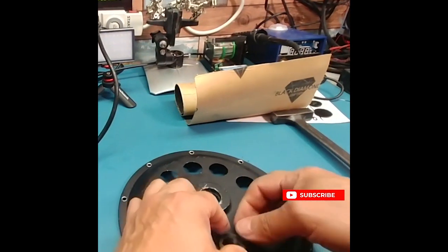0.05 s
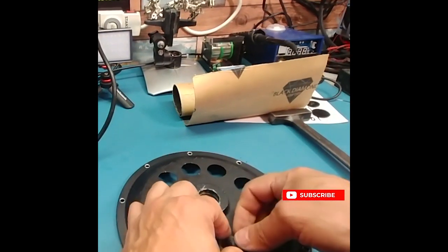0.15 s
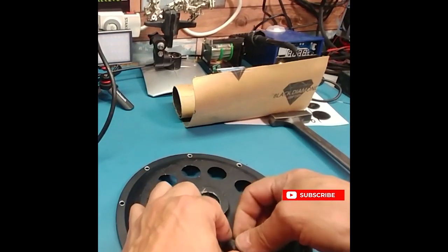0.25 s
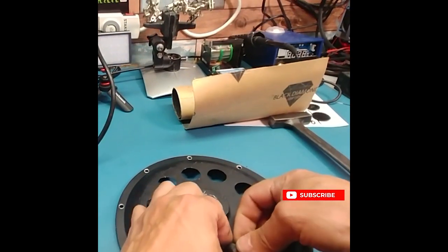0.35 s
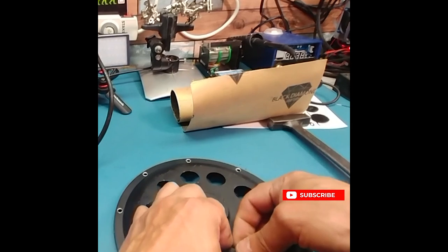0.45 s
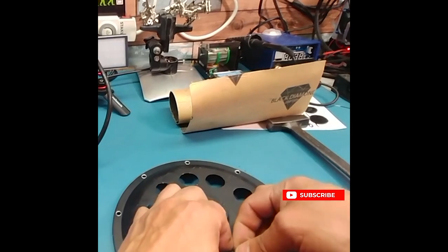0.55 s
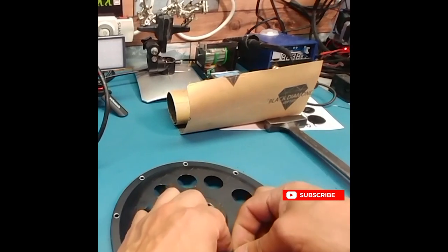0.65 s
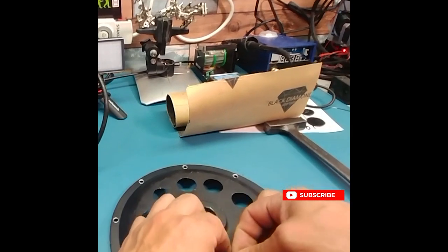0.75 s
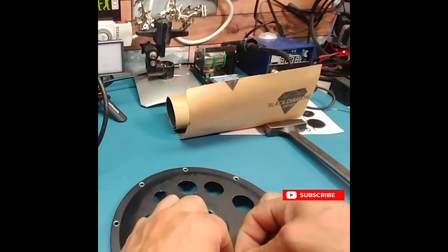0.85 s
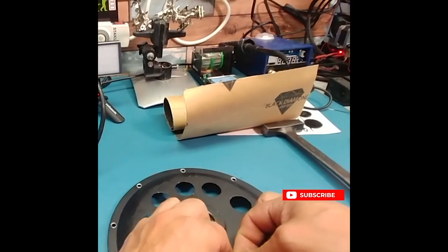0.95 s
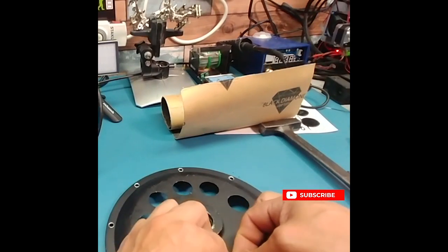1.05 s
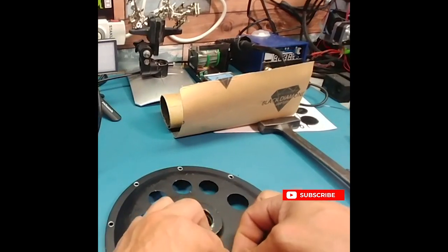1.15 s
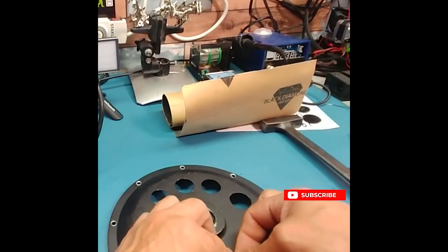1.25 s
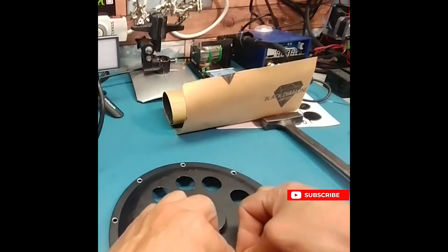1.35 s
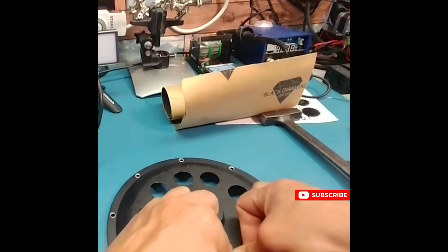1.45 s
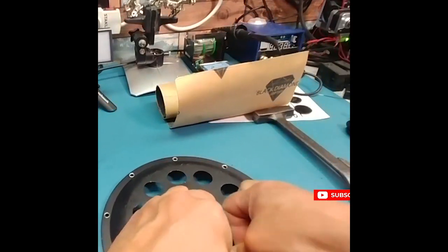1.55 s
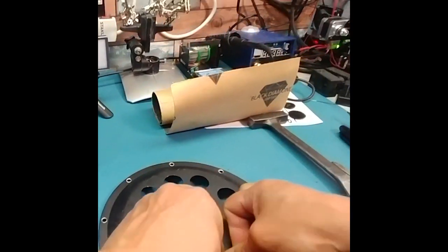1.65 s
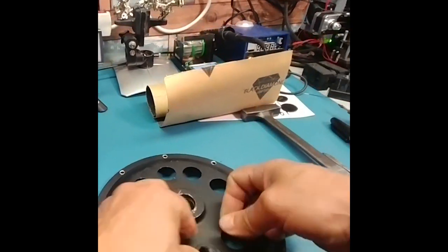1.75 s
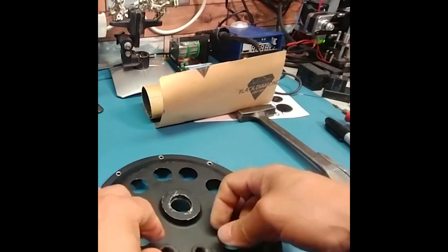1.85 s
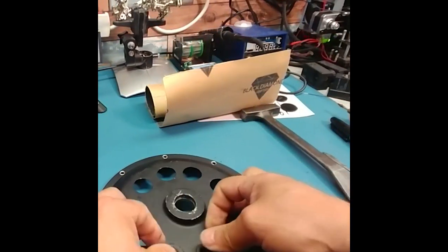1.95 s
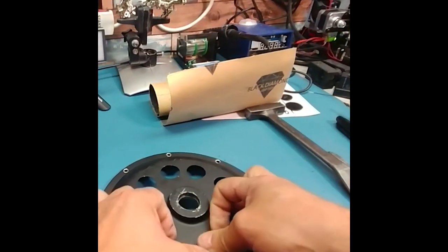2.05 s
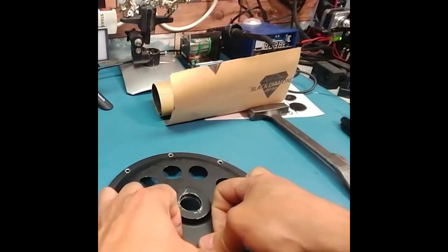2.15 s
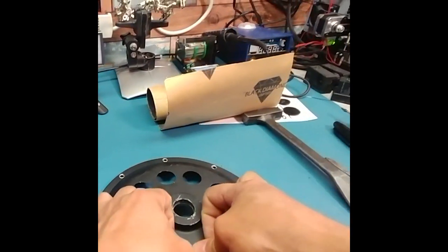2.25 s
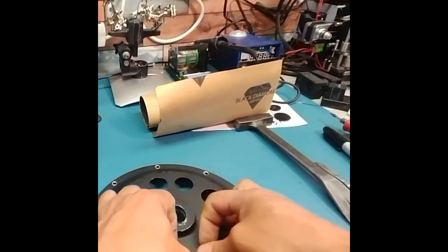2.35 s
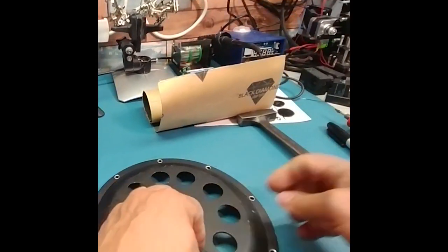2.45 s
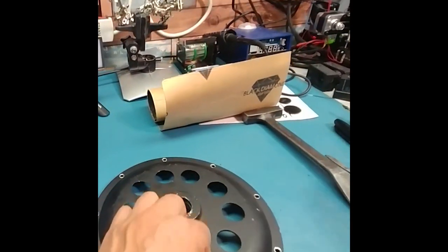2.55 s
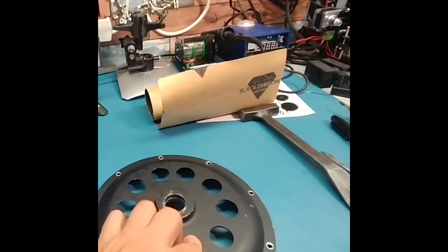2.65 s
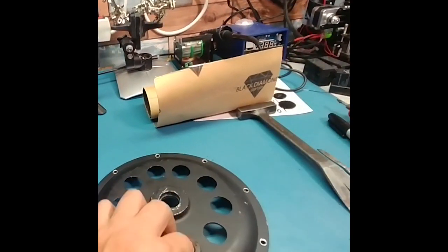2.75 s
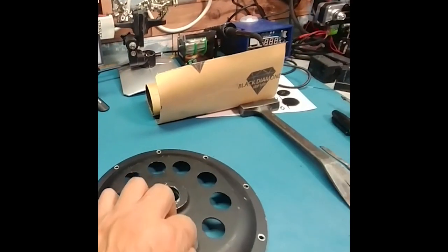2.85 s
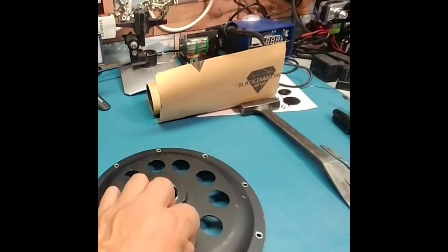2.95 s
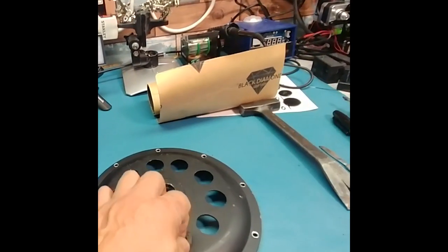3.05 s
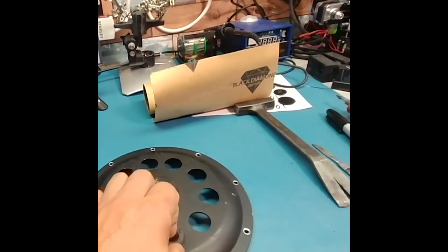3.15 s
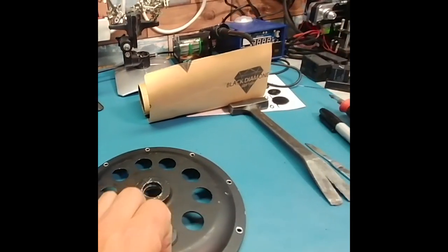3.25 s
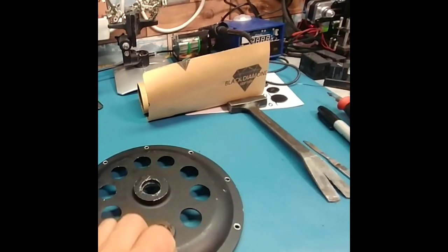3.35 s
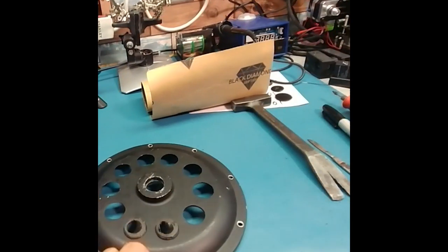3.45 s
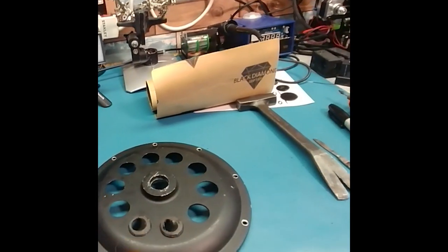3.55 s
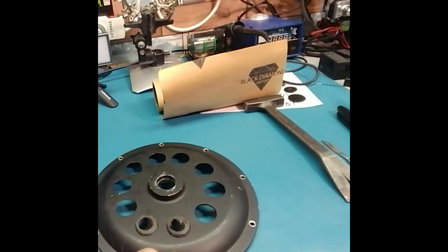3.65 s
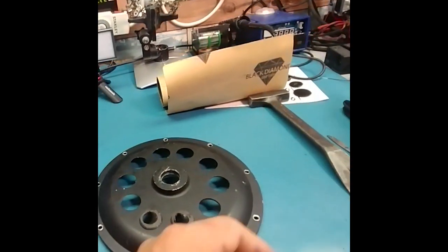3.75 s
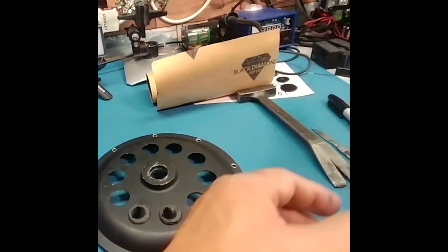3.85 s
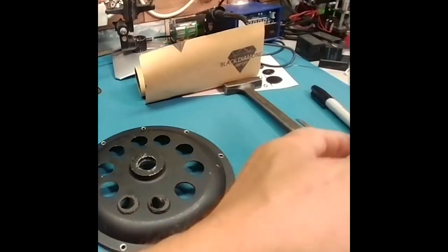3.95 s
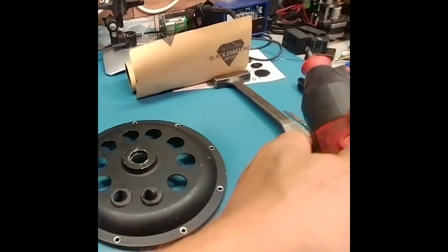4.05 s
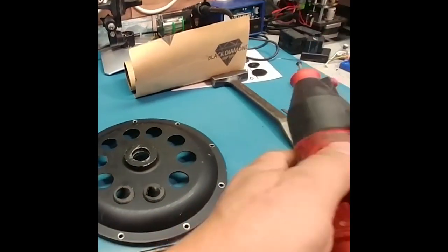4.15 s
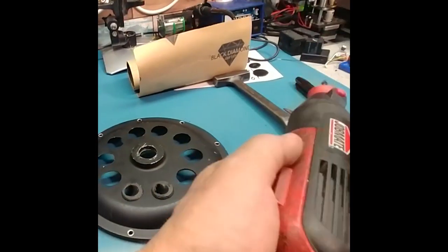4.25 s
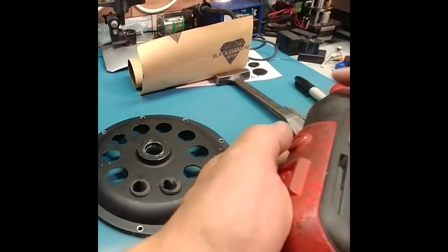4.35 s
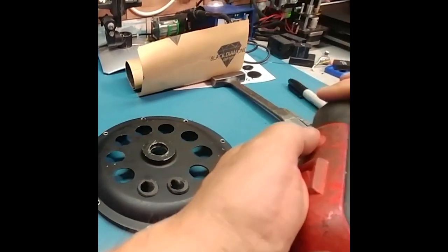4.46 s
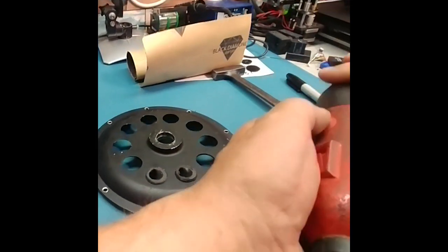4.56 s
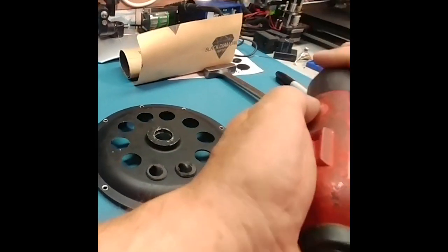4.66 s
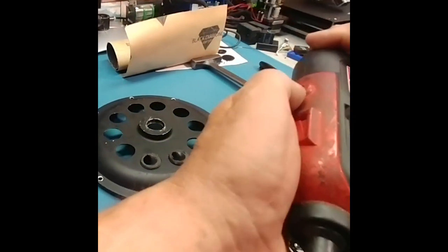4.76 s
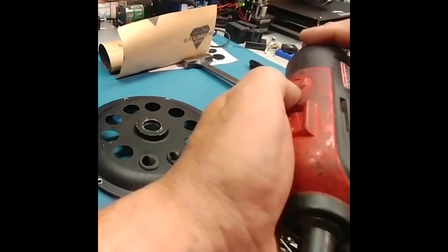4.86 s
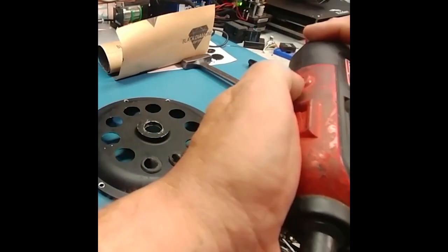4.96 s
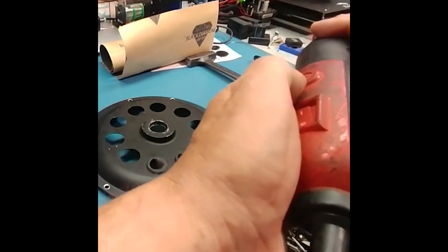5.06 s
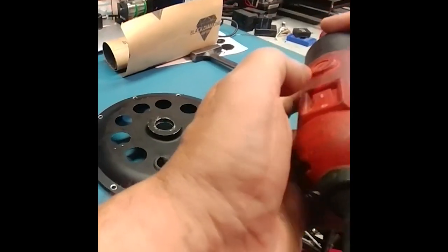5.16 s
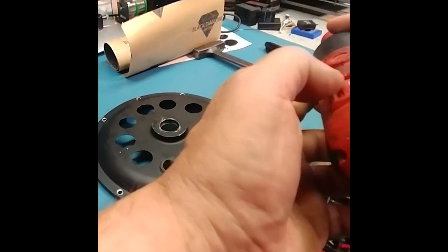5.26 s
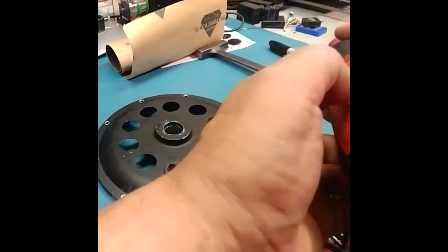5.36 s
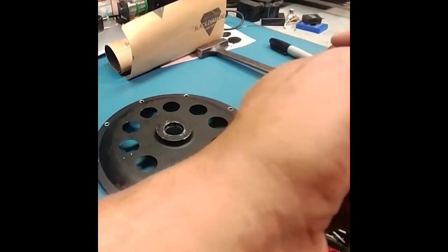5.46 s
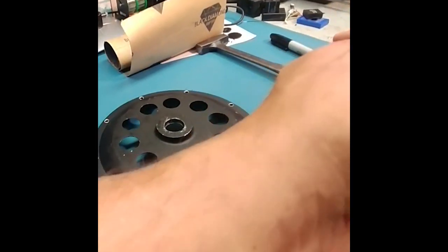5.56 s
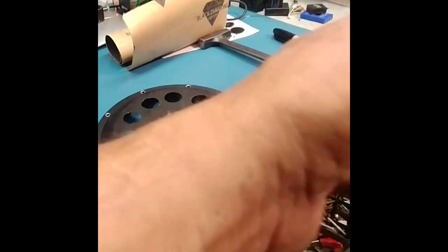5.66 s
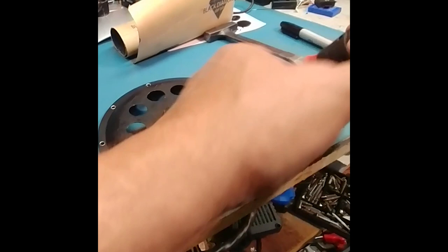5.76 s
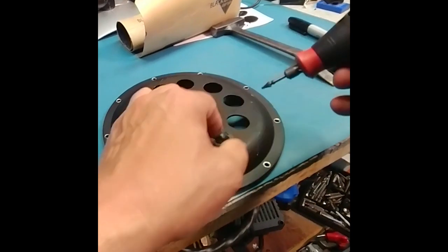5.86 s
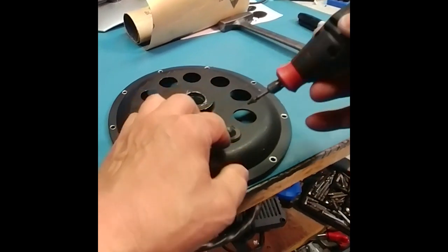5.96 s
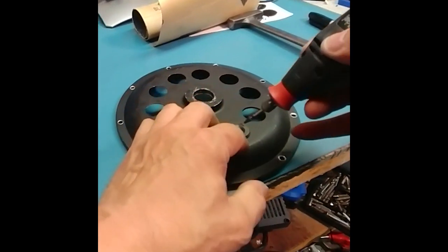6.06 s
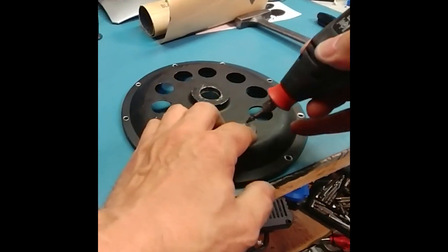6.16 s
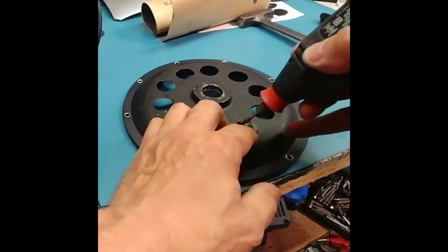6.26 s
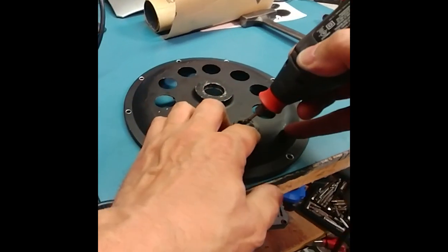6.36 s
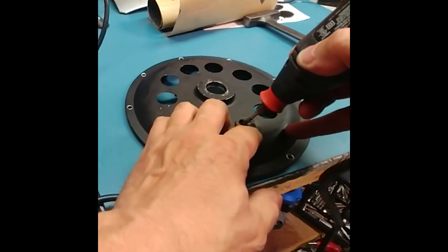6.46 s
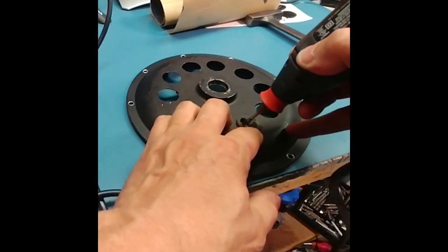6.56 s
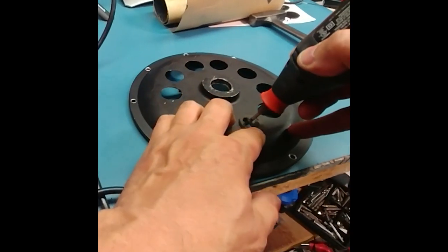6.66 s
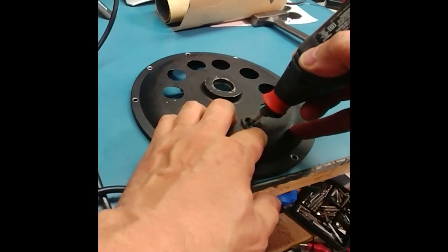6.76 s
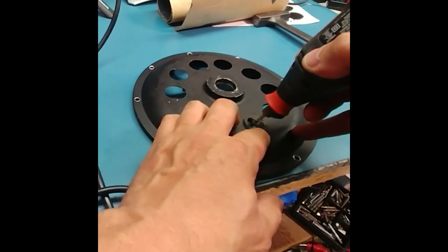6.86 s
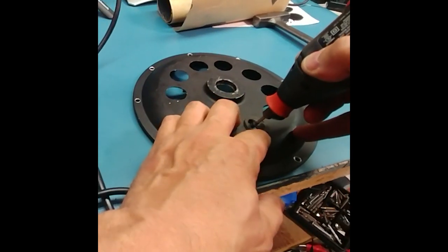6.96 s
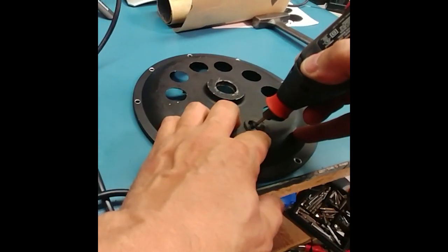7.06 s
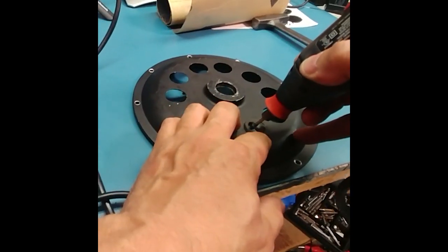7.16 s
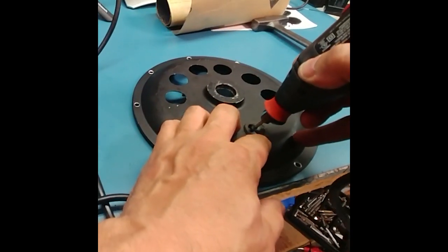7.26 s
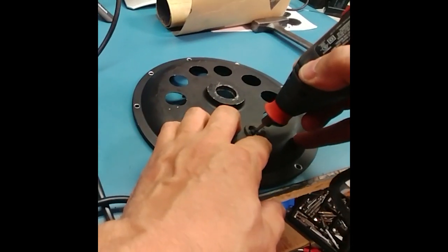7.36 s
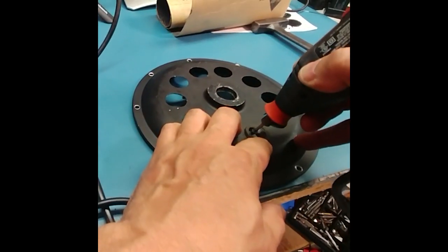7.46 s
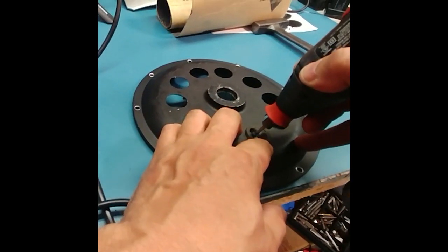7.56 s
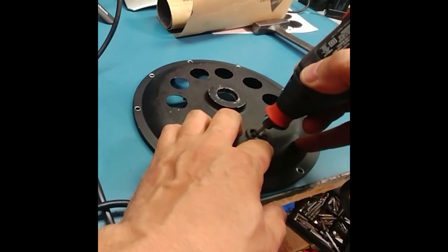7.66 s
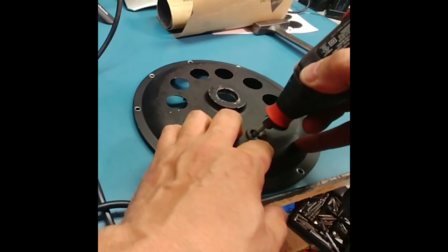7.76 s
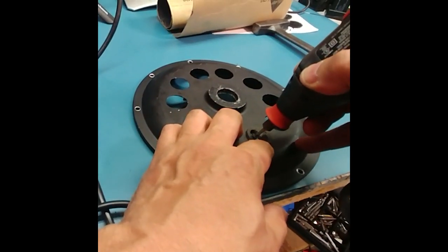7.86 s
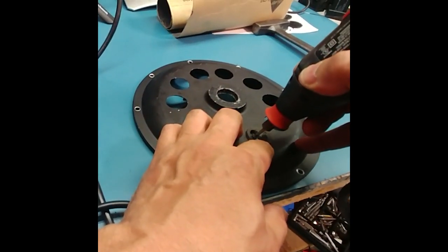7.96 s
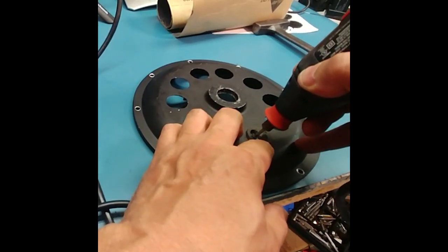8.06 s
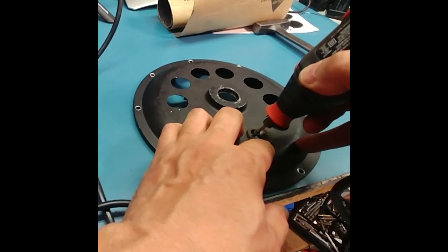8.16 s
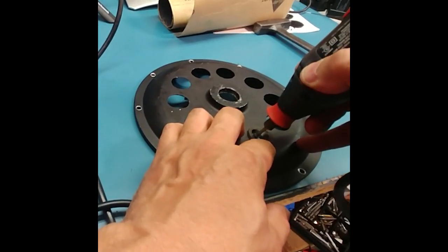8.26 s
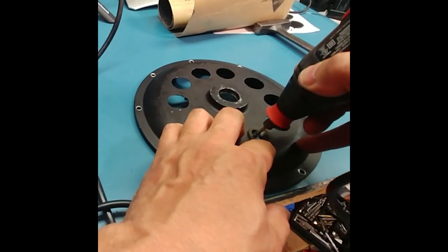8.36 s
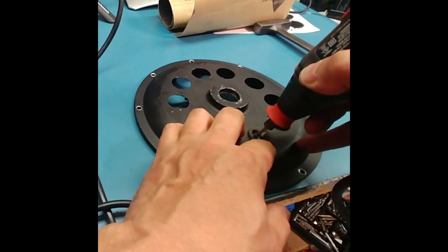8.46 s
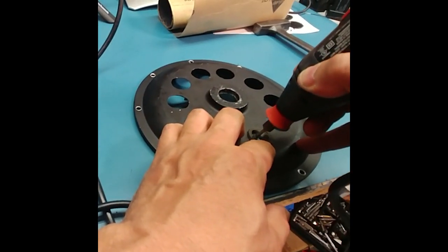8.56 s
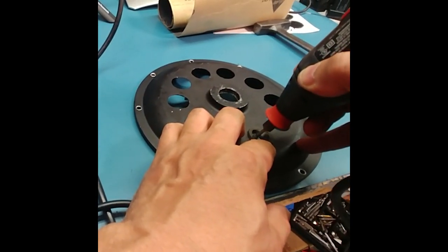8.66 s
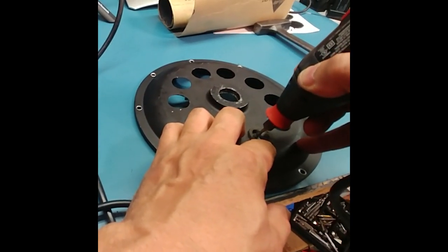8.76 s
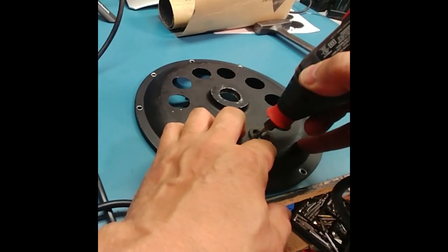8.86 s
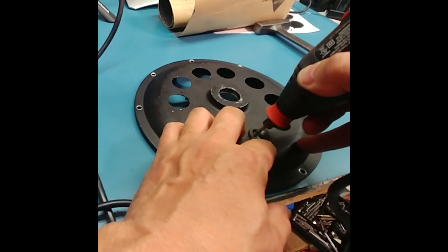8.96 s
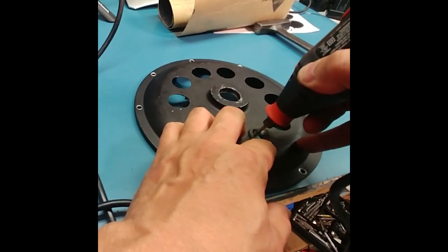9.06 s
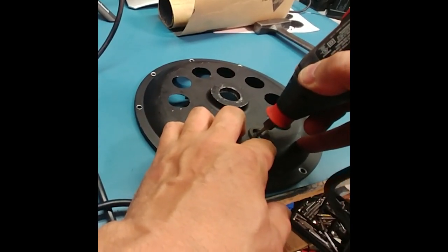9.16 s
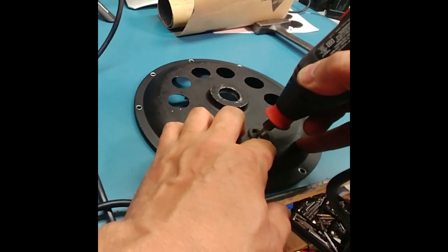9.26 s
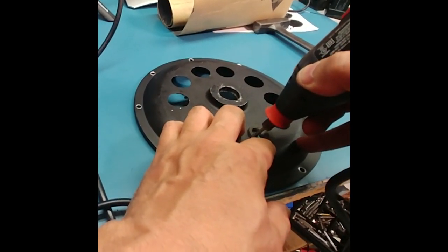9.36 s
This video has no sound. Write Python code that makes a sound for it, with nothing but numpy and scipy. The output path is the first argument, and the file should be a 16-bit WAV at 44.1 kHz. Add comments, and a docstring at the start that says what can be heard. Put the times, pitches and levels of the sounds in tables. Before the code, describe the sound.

Fingers rub and knock a hollow plastic disc at a humming bench, then a switch snaps and a rotary tool whines up, grinding and rattling.

```python
"""A rotary tool spins up on mains power at a workbench: motor lines, throbbing air noise and housing roar.
Its bit touches a pierced disc again and again: struck ringing modes, gritty hiss, wobble and a first squeal.
Earlier, fingers rub the disc (short grainy bands), knock it (rattles that ring it), and a switch snaps.
Behind lie a humming workshop, a thin flickering whine and thumps of draught; two ports listen close by."""
import sys
import numpy as np
from scipy import signal
from scipy.fft import rfft, irfft
from scipy.io import wavfile
from scipy.ndimage import uniform_filter1d

SR = 44100
rng = np.random.default_rng(int(sys.argv[2]) if len(sys.argv) > 2 else 0)


def int16_out(signal):
    """Quantize to a 16-bit WAV file."""
    q = np.round(np.clip(np.atleast_2d(signal).T, -1, 1) * 32767)
    wavfile.write(sys.argv[1], SR, q.astype(np.int16))


def how_loud(loudness_db):
    """Turn decibels into a plain amplitude multiplier (0 dB gives 1, 20 dB gives 10)."""
    steps = np.asarray(loudness_db, float) / 20
    return 10 ** steps


N = 414981
T = np.arange(N) / SR
RIPPLE_HZ = 120  # ripple of the mains current
ON_S, FULL_HZ, SINGS_HZ = 5.5, 431, 230  # switch-on time; full and singing speed in shaft turns per s


def level(x, db):
    """Set the rms level."""
    return x * how_loud(db) / np.sqrt(np.mean(x ** 2))


def colour(x, points, size=4096):
    """Minimum-phase filter through (f/Hz, level/dB) points, from the folded cepstrum."""
    hz, db = np.transpose(points)
    bins_hz = np.arange(size // 2 + 1) * SR / size
    log_gain = np.interp(np.log(bins_hz + 1), np.log(hz), db) * np.log(10) / 20
    cepstrum = irfft(log_gain)
    cepstrum[1:size // 2] *= 2
    cepstrum[size // 2 + 1:] = 0
    response = irfft(np.exp(rfft(cepstrum)))
    response = response.reshape((1,) * (x.ndim - 1) + (-1,))
    return signal.fftconvolve(x, response, axes=-1)[..., :x.shape[-1]]


def ring(modes, size):
    """Impulse response of decaying sine modes (f/Hz, level/dB, t60/s)."""
    t = T[:size]
    return sum(how_loud(db) * np.sin(2 * np.pi * hz * t) * np.exp(-np.log(1000) * t / t60)
               for hz, db, t60 in modes)


def curve(table, off_db=-120):
    """Columns of a table over time; off before it, and off after it unless it reaches the end."""
    s, *columns = np.transpose(table)
    reaches_end = s[-1] > T[-2000]
    return [np.interp(T, s, c, left=off_db, right=c[-1] if reaches_end else off_db) for c in columns]


def walk(rate):
    """Random levels held 1 / rate s, then slewed by two running means."""
    k = int(SR / rate)
    steps = np.repeat(rng.standard_normal(N // k + 1), k)
    return 1.37 * uniform_filter1d(uniform_filter1d(steps, k), k)[:N]


def swell(s, attack, hold, release):
    """Envelope from time s: linear attack, hold and exponential release, peak 1."""
    rise = np.clip((T - s) / attack, 0, 1)
    return rise * np.exp(-np.clip(T - s - attack - hold, 0, 30 * release) / release)


def add(out, s, sound, db, pan_db):
    """Place a sound at time s with its peak level and pan (left minus right)."""
    i = int(s * SR)
    gains = how_loud(db + np.array([[pan_db], [-pan_db]]) / 2)
    out[:, i:i + len(sound)] += gains * (sound / abs(sound).max())[:N - i]


def at_ports(sound, lag=8 / SR):
    """The tool stands to the right, so the left port hears it later."""
    return np.array([np.interp(T - lag, T, sound), sound])


def vents(points, alike):
    """Coloured noise from several openings at rms 1: only a share is alike at both ports."""
    both = at_ports(rng.standard_normal(N))
    own = rng.standard_normal((2, N))
    return level(colour(alike * both + np.sqrt(1 - alike ** 2) * own, points), 0)


def lines(table, turns, waver_db):
    """Wavering sines on multiples of the shaft speed, shifted by multiples of the current ripple."""
    total = 0
    for k, m, db in table:
        cycles = k * turns + m * RIPPLE_HZ * T + rng.random()
        total = total + how_loud(db + waver_db * walk(9)) * np.sin(2 * np.pi * cycles)
    return total


# Spectrum of the far-off workshop air: f/Hz, level/dB (per Hz)
SHOP_AIR = [(12, -59), (20, -33), (64, -2), (133, -6.5), (182, -19.5), (276, -1.5), (430, -16.5),
            (490, -15), (1010, -24.5), (1160, -24), (1390, -32), (2330, -40.5), (7130, -51.5), (8120, -47),
            (10000, -74), (13000, -98), (22000, -120)]
# Machine hums as narrow bumps in that noise: f/Hz, width/Hz, level/dB
SHOP_HUMS = [(62, 15, 0.5), (141, 44.6, -2), (235, 12.5, -7.5), (276.3, 13.7, -1.5), (465, 9.4, -18),
             (798, 120, -20.5)]


def shop_hum():
    """Machines hum far off: shaped noise, alike on both ports in the bass only."""
    hz = np.arange(N // 2 + 1) * SR / N
    air_hz, air_db = np.transpose(SHOP_AIR)
    base_db = np.interp(np.log(hz + 1), np.log(air_hz), air_db)
    bumps = sum(how_loud(2 * (db - 0.5)) / (1 + (2 * (hz - f) / w) ** 2) ** 2 for f, w, db in SHOP_HUMS)
    apart = 1 / np.sqrt(1 + (450 / (hz + 1)) ** 4) + 0.04  # stereo width grows with pitch
    power = how_loud(2 * (base_db - 3.5)) + bumps
    mid, side = rfft(rng.standard_normal((2, N))) * np.sqrt(power)
    hum = irfft(mid + apart * side * np.array([[1], [-1]]), N)
    return level(hum, -34.5) * how_loud(walk(2.58))


# Partials of the thin electrical whine: multiple of its base pitch, level/dB
BUZZ = [(1, -59), (2, -74), (3, -74), (4, -75), (5, -78), (6, -81), (7, -79)]


def electrical_whine():
    """A thin whine: steady harmonics of 1130.8 Hz, each flickering in level by itself."""
    return sum(how_loud(db + 3 + 3 * walk(4)) * np.sin(2 * np.pi * k * 1130.8 * T) for k, db in BUZZ)


# Modes of the pierced disc: f/Hz, level/dB, t60/s
DISC = [(353, -21, 0.074), (507, -2, 0.089), (752, -8.5, 0.092), (1575, -7, 0.054), (1677, -5, 0.049),
        (3100, -16, 0.046), (3350, -14, 0.11), (3850, -4.5, 0.032), (4256, -4.5, 0.041), (4560, -9, 0.046),
        (5066, -7.5, 0.044), (5151, -2.5, 0.054), (5626, -7.5, 0.042), (5800, -7, 0.041),
        (9300, -4.5, 0.04)]


def disc(drive, size):
    """The disc rings in all its modes when driven by a short sound."""
    return signal.fftconvolve(drive, ring(DISC, size))[:len(drive)]


# Finger rubs: t/s (of the peak), level/dB, f/Hz (centre), length/s, pan/dB (left minus right)
RUBS = [(0.104, -38.5, 4960, .025, 3), (0.816, -36.5, 8150, .009, 5), (0.857, -30.5, 8540, .002, 2),
        (1.074, -56, 8000, .013, 2), (1.108, -54, 1520, .004, -2), (1.806, -48.5, 8050, .013, 5),
        (2.282, -34, 5200, .022, 1), (2.433, -30, 7850, .014, 7), (2.64, -50, 8100, .008, 5),
        (2.828, -34, 7900, .017, 5), (2.958, -42, 7900, .007, 1), (3.12, -43, 8100, .008, 10),
        (3.168, -41, 4160, .007, 8), (3.423, -52, 7900, .008, 1), (3.69, -54, 8100, .026, -1),
        (3.902, -47.5, 8200, .02, -6), (4.117, -45, 8200, .035, 0), (4.318, -43.5, 8350, .014, 4),
        (4.414, -35, 4240, .02, 5), (4.696, -51, 4600, .028, 6), (5.03, -40, 4400, .01, 6),
        (5.23, -44.5, 4120, .01, 2)]


def rubs():
    """Fingers rub the disc: short bands of grainy noise with a faint ring of the disc."""
    out = np.zeros((2, N))
    t = T[:6000]
    for s, db, hz, length, pan_db in RUBS:
        rise, fall = 0.65 * length, 1.1 * length
        peak_s = 3 * rise
        shape = np.where(t < peak_s, np.exp(-(t / rise - 3) ** 2 / 2), np.exp(-(t - peak_s) / fall))
        grain = rng.standard_normal(6000) * how_loud(1.6 * rng.standard_exponential(6000)) * shape
        band = colour(grain, [(hz / 4, -26), (hz / 1.15, -11), (hz, 0), (hz * 1.07, -10), (hz * 1.6, -28)])
        rung = colour(disc(grain, size=2500), [(1000, -30), (1500, 0), (4600, 0), (5000, -12)])
        add(out, s - peak_s, level(band, 0) + level(rung, -4.5), db, pan_db)
    return out


def room(near, tones):
    """Bench and walls answer with a short, dense noise tail, t60 0.21 s."""
    t = T[:14000]
    fade = np.exp(-np.log(1000) * t / 0.21) * (1 - np.exp(-t / 0.003))
    mid, side = rng.standard_normal((2, 14000)) * fade
    # long waves reach both ports alike
    tail = mid + colour(side, [(150, -21), (600, 6.5)]) * np.array([[1], [-1]])
    tail = tail / np.sqrt(np.sum(tail ** 2, axis=1, keepdims=True))
    # steady tones come mostly straight from the tool, so they feed the tail less
    return signal.fftconvolve(how_loud(-3) * near + how_loud(-13) * tones, tail, axes=1)[:, :N]


# Knocks: t/s, level/dB, bass/dB (gain below 900 Hz), rattle decay/s, pan/dB (left minus right)
KNOCKS = [(1.24, -15, -3.5, 0.0074, 4), (1.306, -24.5, 15, 0.0092, 3), (1.5493, 0, -3.5, 0.034, 3.5),
          (2.245, -19.5, 0, 0.019, 4), (2.422, -35.5, -6, 0.026, 2), (2.826, -42, 1, .012, 1),
          (3.11, -41.5, -4, 0.011, 3), (3.341, -28, 32, 0.018, 4), (3.644, -35, 0, 0.018, 0),
          (5.418, -25, 34, 0.046, 6)]


def knocks():
    """Fingers knock the disc: a 2 ms crack and a longer rattle of noise, which also ring the disc."""
    out = np.zeros((2, N))
    t = T[:6000]
    for s, db, bass_db, decay, pan_db in KNOCKS:
        rattle = rng.standard_normal(6000) * (np.exp(-t / decay) + 1.8 * np.exp(-t / 0.002))
        # a fingertip is soft, so it drives the low modes most
        rung = colour(disc(rattle, size=6000), [(1700, 0), (4000, -12)])
        body = colour(rattle, [(60, 5), (200, 16), (700, 11), (1800, -1.5), (2400, -5.5)])
        knock = level(rung, -4) + level(body, 0)
        knock = colour(knock, [(900, bass_db), (1400, -1), (6500, 1), (8200, 5), (10000, -14.5)])
        add(out, s, knock, db + 3.5, pan_db)
    return out


# Snaps of the switch: t/s, level/dB
SWITCH = [(5.4966, 0), (5.5034, -19), (5.5662, -15)]
# What each snap rings: f/Hz, level/dB, t60/s
SWITCH_MODES = [(3250, -9, 0.032), (6320, 13, 0.0074), (8100, 11, 0.018), (11900, -22, .006)]


def switch():
    """The switch snaps: a few ringing modes and a softer burst of noise coloured like the tool's air."""
    out = np.zeros((2, N))
    for s, db in SWITCH:
        burst = colour(rng.standard_normal(1500) * np.exp(-T[:1500] / 0.0072), AIR)
        add(out, s, ring(SWITCH_MODES, size=1500), db, 0)
        add(out, s, burst, db - 11.5, 4)
    return out


# Spin-up of the motor: t/s, f/Hz (shaft turns per s)
SPEED = [(5.5, 12), (5.56, 58.75), (5.62, 103.75), (5.7, 158.25), (5.8, 207.25), (5.9, 242.75),
         (6.05, 285.5), (6.2, 316.5), (6.4, 346.5), (6.6, 369.0), (6.8, 386.0), (7.0, 400.25),
         (7.3, 415.25), (7.6, 425.0), (8.0, 430.0), (8.4, 434.0), (8.8, 432.0), (9.1, 430.5), (9.41, 431.0)]


def spin():
    """Shaft speed, smoothed, and the turns made so far with a slight random drift of pitch."""
    hz = uniform_filter1d(np.interp(T, *np.transpose(SPEED)), size=3000)
    turns = np.cumsum(hz * (1 + 0.0004 * walk(20))) / SR
    return hz, turns


# Spectrum of the fan air: f/Hz, level/dB (per Hz)
AIR = [(1100, -15.5), (1900, -34), (2800, 4), (4000, -3), (5700, 0), (7200, 0), (7700, 9.5), (8300, 11.5),
       (8900, 1), (9600, -11.5), (10100, -27), (11500, -17), (13000, -14.5), (15500, -8.5)]


def fan_air(air_db, throb):
    """Fan air: noise from the vents that throbs with the current and flutters at random."""
    return vents(AIR, alike=0.4) * (1 + 0.4 * throb) * how_loud(air_db + 1.5 + 1.2 * walk(30))


# Spectrum of the brush rasp: f/Hz, level/dB (per Hz)
BRUSHES = [(1200, -27), (2000, -10), (2900, 4), (4500, 2), (6000, -12), (9000, -24)]


def brushes(turns, throb):
    """The brushes rasp while the starting current is high: noise beating eight times a turn."""
    beat = 1 + 0.7 * np.cos(2 * np.pi * 8 * turns)
    rasp = vents(BRUSHES, alike=0.5) * beat * (1 + 0.4 * throb)
    return rasp * how_loud(-25.5) * swell(ON_S, attack=0.12, hold=0, release=0.11)


# Spectrum of the housing roar: f/Hz, level/dB (per Hz)
ROAR = [(88, -28), (150, -22.5), (334, -12), (429, -17), (466, -16.5), (847, -14.5), (920, -10.5),
        (2600, -11.5), (3380, -39.5), (5720, -120)]


def housing_roar(roar_db, throb):
    """Housing roar: low noise, mostly alike at both ports, that throbs with the current."""
    return vents(ROAR, alike=0.92) * (1 + 0.3 * throb) * how_loud(roar_db + 2.14)


# Unbalance and magnetic pull: multiple of shaft speed, multiple of ripple added, level/dB
SHAKE = [(2, -1, -12.5), (2, 0, -5.5), (2, 1, -10.5), (3, 0, -6.5), (4, 0, -13), (5, 0, -20), (6, 0, -8),
         (7, 0, -8)]


def shake(hz, turns, roar_db):
    """Unbalance and magnetic pull sound low multiples of the shaft, weaker still below singing speed."""
    return lines(SHAKE, turns, waver_db=2.5) * how_loud(roar_db) * np.minimum(hz / SINGS_HZ, 1) ** 3


# Iron hum: multiple of shaft speed (none), multiple of ripple, level/dB
IRON = [(0, 1, -25.5), (0, 2, -19), (0, 4, -20)]


def iron_hum(turns, air_db):
    """Iron hums with the current, at the same pitch whatever the shaft speed."""
    return lines(IRON, turns, waver_db=3.5) * how_loud(air_db)


# Rotor slots: multiple of shaft speed, multiple of ripple added, level/dB
SLOTS = [(8, -2, -10), (8, -1, 0), (8, 0, -2), (8, 1, -3), (8, 2, -11), (16, -1, -12), (16, 0, -6),
         (16, 1, -12), (24, -1, -13), (24, 0, -4), (24, 1, -10), (40, 0, -8), (56, 0, -14)]
# Resonance of the housing round the whine: f/Hz, level/dB
HOUSING = [(1000, -32), (1900, -22), (2200, -8), (2450, 1), (2680, 4), (2950, -2), (3200, -2), (3470, 1),
           (3570, -8), (4200, -4), (5500, -3), (7000, -3), (8300, 7), (9200, -2), (10300, -14), (12200, 1),
           (15300, 0)]


def slot_whine(hz, turns):
    """Rotor slots whine through the housing, rising up to singing speed; the cut quiets them by 5 dB."""
    load = np.clip((T - 6.7) / 0.13, 0, 1)
    whine_db = -15.5 + 26 * np.log10(np.minimum(hz / SINGS_HZ, 1)) - 5 * load
    return colour(lines(SLOTS, turns, waver_db=1.8) * how_loud(whine_db), HOUSING)


# Uneven shading by the hands: f/Hz, level/dB (left minus right)
SHADE = [(430, 2), (860, 6), (1300, 6), (1720, -5), (2400, -6), (2700, 0), (3300, 4), (3450, 7), (6000, 4),
         (8500, -5), (10000, 0)]


def hand_shade(tone):
    """The hands shade the motor tones unevenly between the ports."""
    left, right = at_ports(tone, lag=5 / SR)
    return np.array([colour(left, [(f, db / 2) for f, db in SHADE]),
                     colour(right, [(f, -db / 2) for f, db in SHADE])])


# How the tool is held: t/s, level/dB (nearness of air and iron hum), pan/dB (noise, left minus right)
HELD = [(5.5, 0, -8), (5.6, 0.5, -5.5), (5.68, -3.5, -1), (5.79, 0.5, -1), (5.9, -1.5, -1), (6.14, 0, -1.5),
        (6.33, 0.5, 1), (6.52, 0, -0.5), (6.7, -0.5, 0), (7.0, 0.8, 0), (7.1, -1, 1), (7.42, 2.3, 1),
        (7.5, -1.5, 0.5), (7.6, 1.2, 1.5), (8.75, -0.5, 0), (8.83, 2.5, 0), (9.25, -1, 0.4), (9.41, 1.5, 1)]


def tool():
    """Motor and bit together: returns the noise, panned by how the tool is held, and the tones."""
    near_db, pan_db = curve(HELD)
    hz, turns = spin()
    on = np.clip((T - ON_S) / 0.1, 0, 1)
    throb = np.cos(2 * np.pi * RIPPLE_HZ * T)
    # rises of 16 and 41 dB per tenfold of speed
    air_db = -16 + 16 * np.log10(hz.clip(60) / FULL_HZ) + near_db
    roar_db = -24.5 + 41 * np.log10(hz / FULL_HZ)
    noise = fan_air(air_db, throb) + brushes(turns, throb) + housing_roar(roar_db, throb)
    motor = shake(hz, turns, roar_db) + iron_hum(turns, air_db) + slot_whine(hz, turns)
    hiss, rung = bit(turns)
    pan = how_loud(np.array([pan_db, -pan_db]).clip(-9, 9) / 2)
    tones = hand_shade(motor * on) + wobble(turns) + squeal(turns)
    return (noise * on + hiss + rung) * pan, tones


# A hand sweeps air past the ports: t/s, level/dB
DRAUGHT = [(5.745, -25), (5.875, -25.5)]


def draught():
    """Moving air thumps at the ports: soft swells of bass noise, separate on each port."""
    bass = colour(rng.standard_normal((2, N)), [(30, -11), (70, 1.5), (140, -9), (400, -40)])
    shape = sum(how_loud(db) * swell(s, attack=0.018, hold=0, release=0.073) for s, db in DRAUGHT)
    return level(bass, 0) * shape


REST_S, REST_DB = 6.62, -22  # the bit comes to rest on the disc; its pressure there
# Side load on the bit: t/s (of the peak), level/dB, build-up/dB per s
LEANS = [(6.71, -31, 120), (7.38, -33, 150), (7.9, -26, 24), (8.18, -29, 37), (8.31, -31, 200),
         (8.67, -22.5, 80), (8.96, -24.5, 130), (9.3, -22, 54)]


def wobble(turns):
    """Side load bends the shaft once a turn: a tone that builds, then lets go at 74 dB per s."""
    lean_db = np.max([db - np.where(T < s, build * (s - T), 74 * (T - s)) for s, db, build in LEANS], axis=0)
    lean_db = np.where(T > REST_S, np.maximum(lean_db, -46), lean_db)
    return how_loud(lean_db) * np.sin(2 * np.pi * turns)


# Pushes into the disc: t/s, level/dB (pressure), hold/s, spot (-1 to 1: which side of the rim rings)
PUSHES = [(6.695, -10.5, 0.0087, 0.82), (6.74, -25, 0.06, -0.53), (7.01, -30, 0.022, .7),
          (7.28, -21, 0.12, -.2), (7.568, -11.5, .008, -0.17), (7.59, -21.5, 0.048, -0.58),
          (7.73, -18.5, 0.22, -0.54), (7.99, -25, 0.083, 1.05), (8.06, -27, .12, -0.66),
          (8.29, -13.5, 0.011, -0.3), (8.35, -24.5, 0.074, 0.58), (8.49, -15, 0.036, -0.36),
          (8.58, -18, .1, 1.1), (8.74, -18.5, 0.11, 1.2), (8.95, -19, 0.066, .9), (9.11, -15.5, .04, -0.37),
          (9.19, -21, 0.17, 0.6), (9.38, -20.5, .04, -.1)]
# Spectrum of the grit: f/Hz, level/dB (per Hz)
GRIT = [(800, -36.5), (1400, 19.5), (2300, -11.5), (4000, 12), (5700, 7.5), (7000, -19.5), (9500, 13.5),
        (10300, 1.5), (15500, 10)]


def bit(turns):
    """The bit's high spot strikes once a turn with a new force: returns grit hiss and the disc's ring."""
    press = how_loud(REST_DB) * np.clip((T - REST_S) / 0.05, 0, 1)
    spot = 0
    for s, db, hold, side in PUSHES:
        push = swell(s, attack=0.0031, hold=hold, release=0.02)
        press = press + how_loud(db) * push
        spot = spot + side * push
    spot = np.clip(spot, -1, 1)

    force = how_loud(6.7 * rng.standard_normal(int(turns[-1]) + 2))[turns.astype(int)]
    strike = np.exp(-(1 - np.cos(2 * np.pi * turns)) / 0.0033)
    scuff = force * strike + 0.36 * rng.standard_normal(N)
    scuff = np.diff(scuff, prepend=0) * press * how_loud(-17.5)

    rung = 0
    for mode in DISC:
        hz, drive = mode[0], 1
        # spot -1 favours the modes near 5.1 kHz, spot 1 those near 5.7 kHz
        if 5000 <= hz < 5400:
            drive = how_loud(-6.5 + 12 * (-spot).clip(0))
        elif 5400 <= hz < 6000:
            drive = how_loud(-6.5 + 12 * spot.clip(0))
        rung = rung + signal.oaconvolve(scuff * drive, ring([mode], size=4000))[:N]
    return press * how_loud(-2) * vents(GRIT, alike=0.41), at_ports(rung)


def squeal(turns):
    """At first touch the bit squeals four times a turn, louder on the left."""
    shape = swell(6.697, attack=0.0089, hold=0.14, release=0.0124)
    tone = how_loud(-12.5) * shape * np.sin(2 * np.pi * 4 * turns)
    return at_ports(tone) * how_loud(np.array([[2], [-2]]))


def scene():
    """Near sounds and tool tones with their room tail, over the shop, which leans left."""
    shop = (shop_hum() + electrical_whine()) * how_loud(np.array([[1.7], [-1.7]]))
    noise, tones = tool()
    near = noise + rubs() + knocks() + switch()
    return how_loud(-0.5) * near + tones + room(near, tones) + shop + draught()


def band_limit(x):
    """A steep low-pass at the top of the band."""
    return signal.sosfilt(signal.butter(12, 15960, fs=SR, output="sos"), x)


def record(dry):
    """The top is cut steeply at 15.72 kHz and peaks beyond full scale are clipped."""
    top_cut = signal.ellip(10, 0.3, 60, 15720, fs=SR, output="sos")
    mix = np.clip(signal.sosfilt(top_cut, dry), -1, 1)
    return band_limit(mix)


dry = scene()
out = record(dry)
int16_out(out)
```